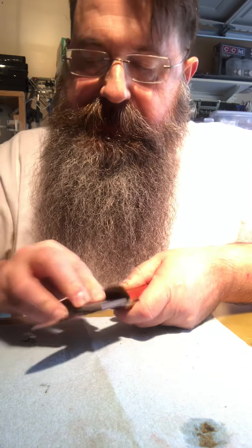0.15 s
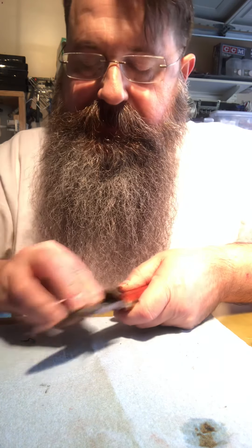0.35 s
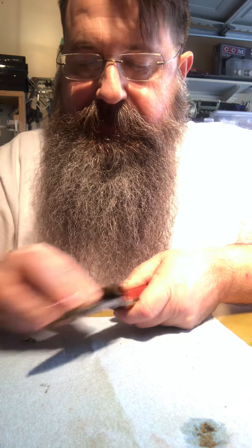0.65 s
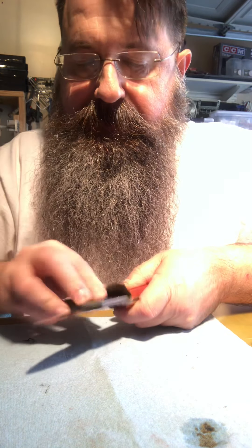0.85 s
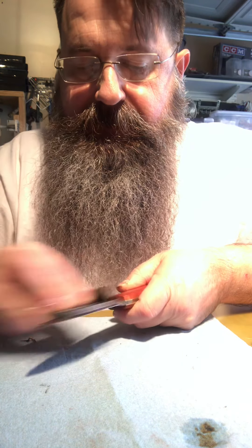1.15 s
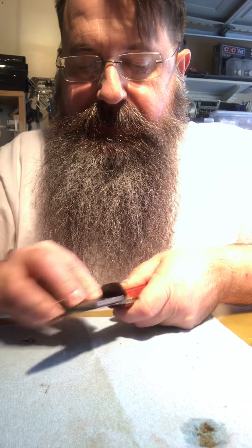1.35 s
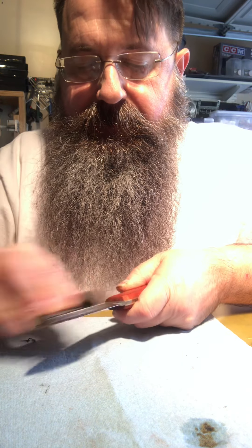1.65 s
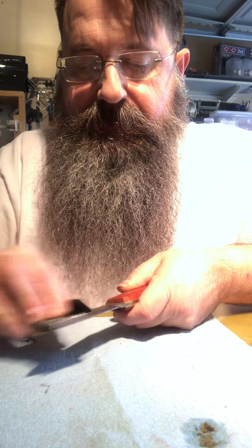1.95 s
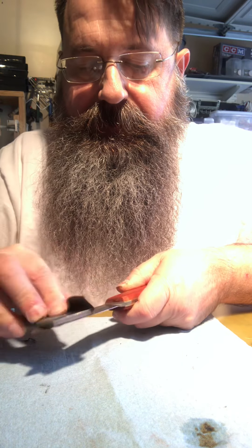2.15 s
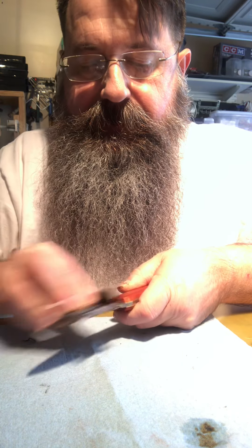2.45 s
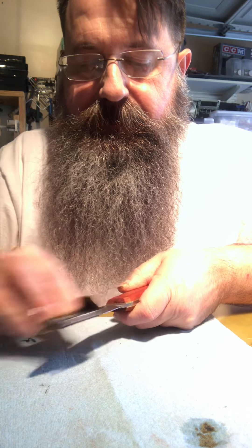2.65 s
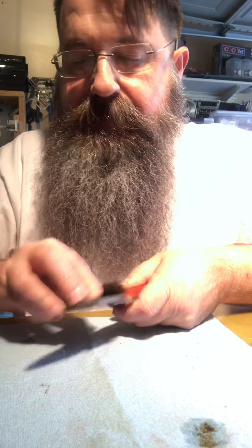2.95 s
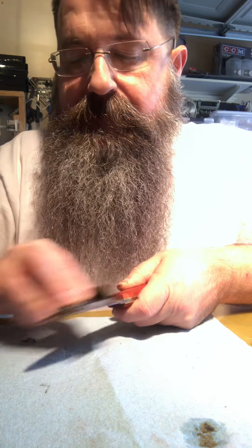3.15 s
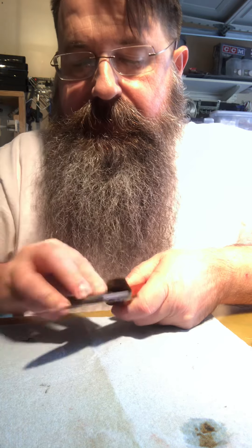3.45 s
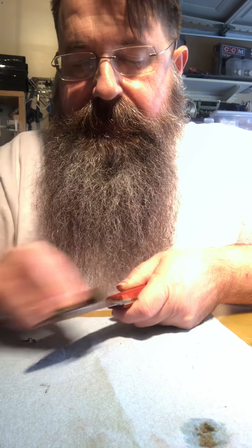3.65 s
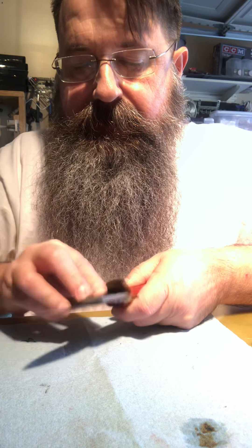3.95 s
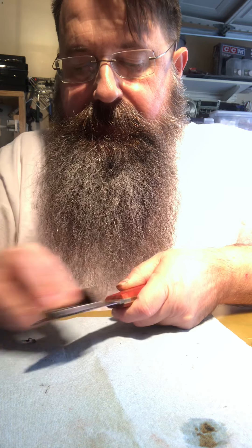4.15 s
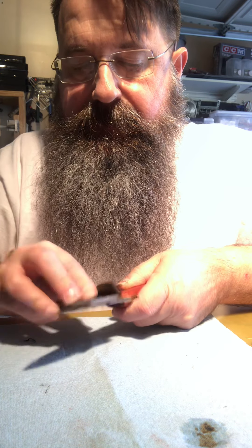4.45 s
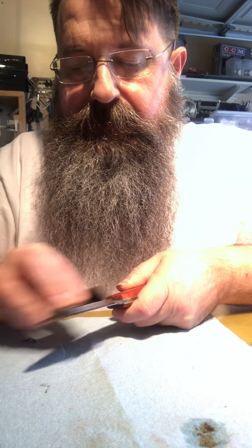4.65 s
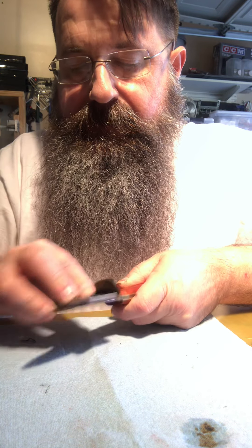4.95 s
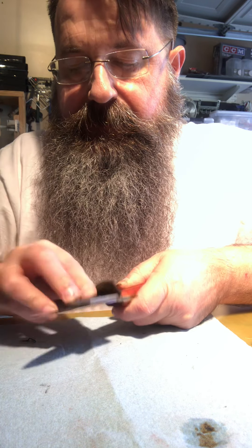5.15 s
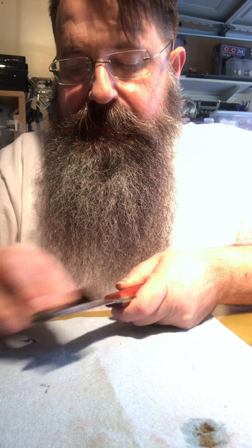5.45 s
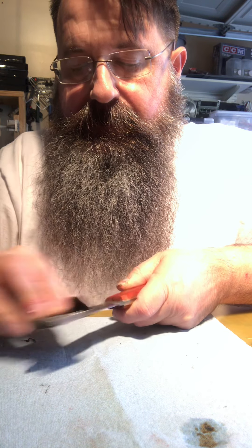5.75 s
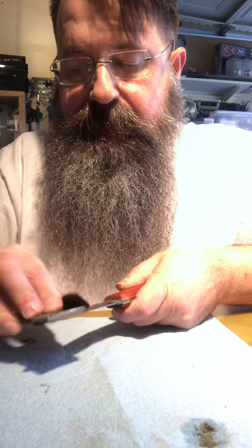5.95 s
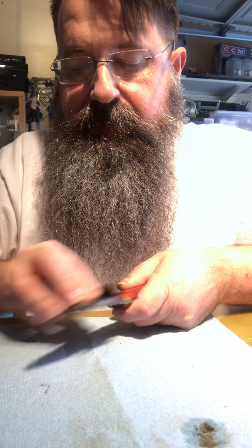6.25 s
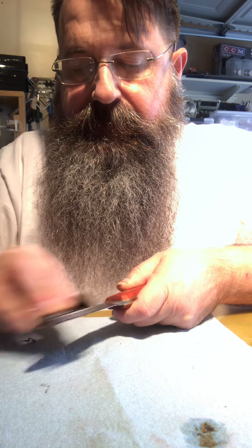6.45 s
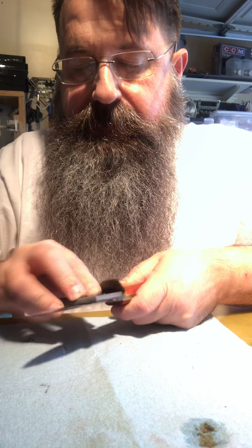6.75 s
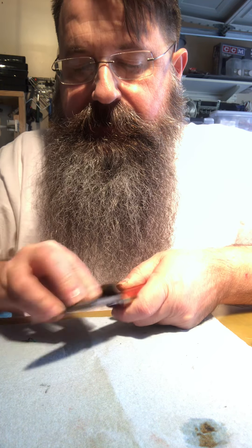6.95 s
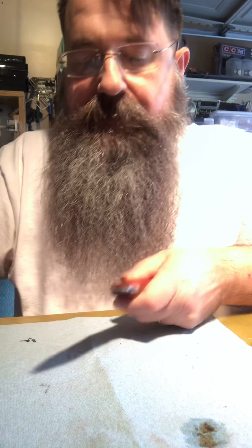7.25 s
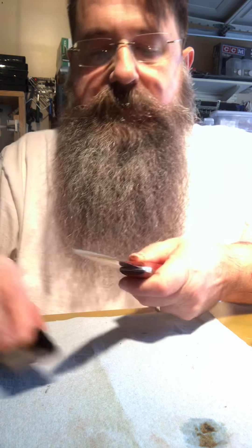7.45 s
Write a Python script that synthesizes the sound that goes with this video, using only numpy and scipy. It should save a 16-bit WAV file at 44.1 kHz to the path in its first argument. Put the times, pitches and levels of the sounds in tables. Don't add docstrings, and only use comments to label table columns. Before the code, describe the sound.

A close microphone in a small, fairly dry workshop picks up wet sandpaper already moving on a steel blade. From 0 to about 7.1 seconds it scrubs to and fro, roughly four full cycles a second; each stroke lasts about a tenth of a second, takes hold gradually and stops abruptly. Bright grit hiss carries a hollow steel ring that slides upward towards the handle and downward towards the tip. Some strokes begin with a tiny judder. Short, hard handle knocks interrupt at about 0.4, 2.0, 2.5, 2.7 and 3.4, loudest at 3.7 and 3.9, with faint bench thumps; afterwards the rubbing is mostly uninterrupted. Steady low mains hum, soft rumble and faint room air remain beneath. A last short flick comes at 7.1, then the sheet lifts with a light rustle, nearly silent until a sharp crackling slap at 7.5 and a brief settling rustle.

```python
import sys
import numpy as np
from scipy import signal
from scipy.fft import rfft, irfft, next_fast_len
from scipy.io import wavfile
from scipy.ndimage import uniform_filter1d, minimum_filter1d

SR = 44100
rng = np.random.default_rng(int(sys.argv[2]) if len(sys.argv) > 2 else 0)


def boost(x):
    u = np.asarray(x, float) / 20
    return 10 ** u


def to_wav(s):
    ch = np.atleast_2d(s).T
    pcm = np.round(np.clip(ch, -1, 1) * 32767)
    wavfile.write(sys.argv[1], SR, pcm.astype(np.int16))


N = 334719


def evened(x):
    return x / np.sqrt(np.mean(x ** 2) + 1e-20)


def read(points, hz):
    f, value = np.transpose(points)
    return np.interp(np.log(hz + 1), np.log(f + 1), value)


def add(mix, s, sound):
    part = mix[round(s * SR):][:len(sound)]
    part += sound[:len(part)]


def coloured(x, points):
    size = next_fast_len(len(x))
    gain = boost(read(points, np.fft.rfftfreq(size, 1 / SR)))
    return evened(irfft(rfft(x, size) * gain, size)[:len(x)])


def resonate(x, hz, width):
    turn = np.exp(2j * np.pi * np.cumsum(hz * np.ones(len(x))) / SR)
    r = np.exp(-np.pi * width / SR)
    smooth = signal.lfilter([(1 - r) ** 2], [1, -2 * r, r * r], x / turn + 1e-18)
    return 2 * (turn * smooth).real


def grains(per_s, spread_db):
    chance, e, sign = rng.random((N, 3)).T
    size = boost(spread_db * np.minimum(-np.log(1 - e), 5))
    return evened((chance < per_s / SR) * size * np.sign(sign - .5))


def thump_db(peak_db, bass_db):
    return min(peak_db + bass_db + 5.0, -42)


# f/Hz, level/dB rms
HUM = [(120.1, -49), (240.2, -79)]
# f/Hz, level/dB
RUMBLE = [(18, -42), (30, -30), (45, -1), (62, 2.5), (90, 0), (150, -2.5), (200, -17), (300, -22),
          (500, -80)]
# f/Hz, level/dB per Hz
ROOM = [(100, -68), (170, -8), (253, -9.5), (364, -6), (450, -11.5), (700, -11), (860, -11.5), (1400, -10),
        (2000, -5), (3000, -21.5), (6000, -65), (16000, -60)]


def background():
    t = np.arange(N) / SR
    bench, air, c, d = rng.standard_normal((N, 4)).T
    waver_db = 0.6 * evened(uniform_filter1d(uniform_filter1d(c, 6000), 6000))
    hum = sum(boost(db + waver_db) * np.sqrt(2) * np.sin(2 * np.pi * hz * t) for hz, db in HUM)
    wander_db = 1.5 * evened(uniform_filter1d(uniform_filter1d(d, 4000), 4000))
    shake = boost(-55.5 + wander_db)
    blows = [(s, thump_db(peak_db, bass_db) - 4.5) for s, peak_db, _, bass_db, _ in KNOCKS]
    blows += [(7.505, -40.5)]
    rise_s = 0.023
    for s, db in blows:
        after = np.maximum(t - s, 0) / rise_s
        shake = np.hypot(shake, boost(db) * after * np.exp(1 - after))
    return hum + shake * coloured(bench, RUMBLE) + boost(-64.5) * coloured(air, ROOM)


# start t/s, end t/s, pressure level/dB, free blade pitch at the end f/Hz
TOWARDS = [(0.023, 0.119, -36, 1450), (0.26, .348, -37.5, 1760), (0.486, 0.582, -35.5, 1750),
           (0.724, 0.813, -37.5, 1740), (0.967, 1.064, -38.5, 1660), (1.211, 1.304, -37.5, 1760),
           (1.453, 1.548, -39, 1790), (1.689, 1.785, -38.5, 1720), (1.925, 2.005, -37, 1820),
           (2.152, 2.248, -36.5, 1890), (2.39, 2.477, -39.5, 1850), (2.618, 2.692, -39, 1900),
           (2.853, 2.95, -37.5, 1840), (3.076, 3.184, -37.5, 1770), (3.326, 3.415, -39, 2035),
           (3.594, 3.679, -39, 1830), (3.843, 3.923, -39, 1520), (4.098, 4.197, -38.5, 1740),
           (4.351, 4.433, -36, 1610), (4.59, 4.675, -37, 1700), (4.82, 4.908, -39, 1910),
           (5.049, 5.128, -37.5, 1884), (5.262, 5.349, -35, 2070), (5.49, 5.586, -37.5, 1890),
           (5.724, 5.816, -37.5, 1870), (5.951, 6.04, -37.5, 1810), (6.171, 6.261, -37, 1800),
           (6.413, 6.5, -35.5, 1770), (6.639, 6.727, -36.5, 1660), (6.861, 6.952, -36.5, 1630)]
# start t/s, end t/s, pressure level/dB, free blade pitch at the end f/Hz
AWAY = [(0.144, 0.23, -35.5, 920), (0.382, 0.466, -34.5, 1270), (0.609, .696, -36, 1190),
        (0.844, .935, -37, 1190), (1.095, 1.18, -37, 1070), (1.331, 1.418, -37, 1090),
        (1.583, 1.668, -37.5, 1290), (1.825, 1.908, -37, 1160), (2.056, 2.134, -36.5, 1100),
        (2.274, 2.366, -39, 980), (2.508, 2.602, -37.5, 1280), (2.728, 2.828, -36.5, 1050),
        (2.962, 3.056, -38.5, 1040), (3.212, 3.306, -39.5, 950), (3.449, 3.547, -38, 1150),
        (3.715, 3.811, -38, 1230), (3.973, 4.07, -37, 1140), (4.229, 4.316, -35.5, 1250),
        (4.466, 4.553, -36, 1080), (4.699, 4.792, -40, 980), (4.943, 5.019, -36, 1280),
        (5.155, 5.233, -38, 1420), (5.378, 5.465, -37.5, 1400), (5.614, 5.7, -36.5, 1260),
        (5.842, 5.929, -36, 1330), (6.064, 6.148, -36.5, 1290), (6.3, 6.383, -36.5, 1070),
        (6.523, 6.612, -38, 1050), (6.745, 6.834, -36.5, 1300), (6.97, 7.081, -39.5, 1040)]
FIRST, FLICK = (0.0, .007, -31, 1450), (7.085, 7.136, -33.5, 1050)
# t/s, fine grit level/dB, blade ring level/dB
HOLD = [(0, 2, -21.5), (.5, 3, -22.5), (.95, 5.5, -18), (1.5, 5, -20.5), (2.15, 3, -22), (2.6, 4.5, -20),
        (3.1, 5, -21), (3.75, 6, -18), (4.3, 4.5, -20), (4.8, 3.5, -22), (5.3, 1.5, -23), (6.0, 3, -22.5),
        (6.6, 4, -20.5), (6.9, 2.5, -21.5), (7.03, 7, -20.5), (7.1, -3.5, -20)]


def hand():
    rise_s, fall_s = (.016, .011), .006
    sag_along_db, creep_level_db = (2.2, -2), (-51, -52)
    fine_way_db, ring_way_db = (0.64, 0.2), (-2.1, -0.8)
    arch_hz = 177

    t = np.arange(N) / SR
    s0, s1, press_db, end_hz = np.transpose(sorted([FIRST, FLICK] + TOWARDS + AWAY))
    span, towards = s1 - s0, np.arange(len(s0)) % 2
    knock_s, knock_db = np.transpose(KNOCKS)[:2]
    near_knock = abs(s1[:, None] - knock_s) < .02
    jolt_db = (near_knock * np.maximum(knock_db + 40, 0)).sum(1)

    sag_db = np.take(sag_along_db, towards) - .1 * jolt_db - 6.0 * (s0 >= s0[-2])
    knots = np.ravel([s0 + .2 * span, s0 + .75 * span], "F")
    knot_db = np.ravel([press_db - sag_db / 2, press_db + sag_db / 2], "F")
    pressure = boost(np.interp(t, knots, knot_db))
    start_hz = np.append(end_hz[0], end_hz[:-1])
    free_hz = np.interp(t, np.ravel([s0, s1], "F"), np.ravel([start_hz, end_hz], "F"))

    moving, speed = np.zeros((2, N))
    for a, b, way in zip(s0, s1, towards):
        near = slice(max(round((a - .06) * SR), 0), round((b + .05) * SR))
        taking_hold = 1 + np.exp((a - t[near]) * 4 / rise_s[way])
        stopping = 1 + np.exp((t[near] - b) * 4 / fall_s)
        moving[near] += 1 / taking_hold / stopping
        speed[near] += np.sin(np.pi * np.clip((t[near] - a) / (b - a), 0, 1))

    turn_db = (np.take(creep_level_db, towards) + 0.13 * jolt_db)[:-1]
    turn_s = np.ravel([np.minimum(s1[:-1] + 0.011, s0[1:]), s0[1:]], "F")
    creep_db = np.interp(t, turn_s, np.ravel([turn_db - 4.5, turn_db + 10.5], "F"))
    creep = boost(creep_db) * (t < s1[-1])

    hold_s, fine_db, ring_db = np.transpose(HOLD)
    middle = s0 + span / 2
    fine_db = np.interp(t, hold_s, fine_db) + np.interp(t, middle, np.take(fine_way_db, towards))
    ring_db = np.interp(t, hold_s, ring_db) + np.interp(t, middle, np.take(ring_way_db, towards))
    blade_hz = uniform_filter1d(free_hz + arch_hz * speed, 900)
    return np.hypot(pressure * moving, creep), speed, blade_hz, fine_db, ring_db


# f/Hz, level/dB per Hz
GRIT = [(1650, -66), (2800, -21), (3290, -17), (4430, -11), (4910, -9.5), (5240, -3), (5760, -6),
        (6620, -1.5), (7600, -3), (9600, -1.5), (10600, -6), (12300, 2), (14300, 3), (16000, -1)]
# tip f/Hz, handle f/Hz, width f/Hz, tip level/dB, handle level/dB
BLADE = [(2500, 2380, 1460, 3.5, 3.5), (3700, 3380, 300, 5.5, 1.5), (600, 680, 440, -3.5, -8),
         (4540, 4600, 480, 8, 10), (5080, 5350, 750, 4, 2), (5820, 3900, 240, 8.5, 8.5),
         (6600, 5200, 420, 2, 11.5)]


def sanding():
    pressure, speed, free_hz, fine_db, ring_db = hand()
    place = (free_hz - 1150) / 600
    hz, t, z = signal.stft(grains(14000, 2.2), SR, nperseg=256, noverlap=192)
    at = np.minimum(np.round(t * SR).astype(int), N - 1)
    fine = np.clip(np.log2((hz[:, None] + 1) / 7000) / 0.81, 0, 1)
    noise = rng.standard_normal(z.shape[::-1])
    patches = evened(uniform_filter1d(uniform_filter1d(noise, 24, 0), 3, 1)).T
    db = read(GRIT, hz)[:, None] + 2.3 * patches
    db = db + fine * (fine_db[at] - 6.0 + 5.1 * (speed[at] - .7))
    db = db - (1 - fine) * 3.06 * (place[at] - .5)
    hiss = evened(signal.istft(z * boost(db), SR, nperseg=256, noverlap=192)[1][:N])

    unevenness = evened(uniform_filter1d(rng.standard_normal(N), 600))
    drive = grains(8000, 2.2) * boost(2.2 * unevenness)
    ring = boost(6.0) * resonate(drive, free_hz, 165)
    grip_hz = uniform_filter1d(-minimum_filter1d(-free_hz, size=12000), size=9000)
    second_hz = 1.2 * grip_hz - 0.26 * (free_hz - grip_hz)
    ring += boost(5.0 - 11.5 * place) * resonate(drive, second_hz, 255)
    for tip_hz, handle_hz, width, tip_db, handle_db in BLADE:
        mode_hz = tip_hz + (handle_hz - tip_hz) * place
        mode_db = tip_db + (handle_db - tip_db) * place
        ring += boost(mode_db) * resonate(drive, mode_hz, width)
    return hiss * pressure * boost(0.73) + ring * pressure ** 0.41 * boost(ring_db - 11.5)


def workshop(x):
    t60 = .17
    taps = np.zeros(12000)
    taps[np.arange(100, 11980, 20) + rng.integers(0, 20, 594)] = rng.choice([-1., 1.], 594)
    hz, t, z = signal.stft(taps, SR, nperseg=128)
    thin = np.minimum(hz[:, None] / 2500, 1)
    decay = boost(-60 * t / t60 * (1 + hz[:, None] / 12000))
    tail = signal.istft(z * thin * decay, SR, nperseg=128)[1]
    return signal.fftconvolve(x, tail / np.linalg.norm(tail))[:N]


# t/s, peak level/dB,
# f/Hz
GRABS = [(0.0253, -38.5, 1350), (0.2568, -37, 1360), (0.4873, -34.5, 2140), (0.6013, -40, 1670),
         (0.7218, -41, 2080), (1.2027, -40.5, 1850), (1.4455, -40, 1770), (1.6876, -42.5, 2050),
         (2.1485, -38, 2180), (3.2038, -41, 2250), (3.3227, -38, 2040), (4.345, -38, 2070),
         (4.5805, -41, 1940), (5.488, -44.5, 1040), (5.9514, -38, 2250), (7.0967, -33, 1960),
         (7.113, -33.5, 288)]


def grabs():
    out, t = np.zeros(N), np.arange(2000) / SR
    swell = (t / .005) * np.exp(1 - t / .005)
    for (s, peak_db, hz), noise in zip(GRABS, rng.standard_normal((len(GRABS), 2000))):
        add(out, s, boost(peak_db - 10.5) * evened(resonate(noise, hz, 380)) * swell)
    return out


# t/s, peak level/dB, treble, bass and hardness level/dB
KNOCKS = [(0.192, -43, 9, -27, 12), (0.363, -22.5, -11, -36, -24), (0.808, -33, -8.5, -13.5, -6),
          (1.058, -36.5, -19, -19, -3), (1.779, -31.5, -5, -11.5, -6), (2.006, -17.5, 0, -20.5, -5),
          (2.468, -26, -8.5, -21.5, -6), (2.69, -12, -8.5, -30, -5.5), (3.075, -36, -2, -20, -23),
          (3.41, -17.5, -3, -22, -4.5), (3.671, -10, 4.5, -23, -2.5), (3.925, -7, 6.5, -28, -4),
          (6.258, -29.5, -31, -25, -7.5), (7.117, -33.5, -26, -40, -11)]
# f/Hz, level/dB, t60 t/s
HANDLE = [(360, -12.5, 0.033), (635, -6, 0.032), (1280, 0.5, 0.0079), (1810, 1.5, 0.012), (2350, -4, 0.005),
          (2860, 0, 0.0088), (3840, -4, 0.0058), (4440, -3.5, 0.0061), (5280, 2.5, 0.0039),
          (6420, -2, 0.0063), (11700, 0, 0.0018)]


def knocks():
    out, t = np.zeros(N), np.arange(6000) / SR
    hz, db, t60 = np.transpose(HANDLE)[:, :, None]
    bass_cut = signal.butter(3, 980, "high", fs=SR, output="sos")
    thump = np.sin(2 * np.pi * 85 * t) * (t / 0.0075) * np.exp(1 - t / 0.0076)
    rattle_t = t[:300]
    draws = rng.standard_normal((len(KNOCKS), 300 + len(hz)))
    for (s, peak_db, treble_db, bass_db, hard_db), draw in zip(KNOCKS, draws):
        contact = .075 * draw[:300] * np.exp(-rattle_t / .002)
        contact[[8, 72]] += 1, .35
        grip_db = (hz > 3300) * (treble_db + 7) + (hz < 900) * (bass_db + 19)
        grip_db = grip_db + (abs(hz - 2700) < 600) * (hard_db + 9)
        mode_hz = hz * (1 + .02 * draw[300:, None])
        modes = boost(db + grip_db - 60 * t / t60) * np.sin(2 * np.pi * mode_hz * t)
        upper = signal.sosfilt(bass_cut, modes[2:].sum(0))
        lower = 1.46 * modes[:2].sum(0) * (1 - np.exp(-t / 0.0047))
        click = signal.fftconvolve(contact, upper)[:len(t)] + lower
        add(out, s + .0004, boost(peak_db + 8.5) * click / abs(click).max())
        add(out, s + 0.0136, boost(thump_db(peak_db, bass_db)) * thump)
    return out


# t/s, level/dB, treble level/dB
LIFT = [
    (7.129, -46, -14),
    (7.15, -66, 3),
    (7.19, -58.5, -6),
    (7.225, -67, -6),
    (7.3, -72, 8),
    (7.35, -67, -0.5),
    (7.39, -83, 8),
]
# t/s, level/dB, treble level/dB
DROP = [
    (7.43, -69, 0),
    (7.46, -63, 0),
    (7.495, -56.5, -3),
    (7.508, -32, -18),
    (7.53, -42, -11),
    (7.566, -47.5, -1),
    (7.59, -57, 3),
]
# t/s, peak level/dB, treble level/dB, thud level/dB, crackle t/ms
SLAPS = [(7.173, -30, -16, -8.5, 2), (7.451, -46, -1, -15, 2.5), (7.472, -40.5, 4, -9, 3),
         (7.482, -38, -6, -9, 1.5), (7.4995, -42, -3, -20, 1.5), (7.5047, -13.5, -1.5, -15, 1),
         (7.51, -18.5, -7, -2.5, 2.6), (7.5175, -12.5, -6, -18, 3.6), (7.531, -35, -10, -22, 3),
         (7.553, -26.5, 0, -2, 7), (7.565, -42, -4, -10, 3)]


def paper():
    t, out = np.arange(N) / SR, np.zeros(N)
    s, db, treble_db = np.transpose(LIFT + DROP)
    soft, crackle = grains(15000, 3.3), grains(5000, 3.0)
    # f/Hz, level/dB
    sheet = [(400, -32), (1000, -7), (1900, -6.0), (2400, -4), (3000, -5), (4000, -4.5),
             (4800, -15), (7000, -37)]
    edge = [(4000, -30), (5500, 2.5), (7000, -1), (9000, -1), (10700, -8.0), (14000, -3), (16000, -13)]
    bench = [(40, -31), (80, -13), (140, 9), (230, -15), (350, -2), (600, -12.5), (900, -35)]
    level = boost(np.interp(t, s, db, left=-120) + 3.0)
    treble = boost(np.interp(t, s, treble_db))
    out += level * (coloured(soft, sheet) + treble * coloured(soft, edge))
    body, snap, thud = coloured(crackle, sheet), coloured(crackle, edge), coloured(soft, bench)
    for s, peak_db, treble_db, thud_level_db, ms in SLAPS:
        after = np.maximum(t - s, 0)
        burst = (t >= s) * np.exp(-after * 1000 / max(ms, .2)) * (body + boost(treble_db) * snap)
        swell = (after / 0.011) * np.exp(1 - after / 0.0089)
        out += boost(peak_db - 8.5) * (burst + boost(thud_level_db - 3.5) * swell * thud)
    return out


def scene():
    rub, hits = sanding() + grabs(), knocks() + paper()
    boxy = resonate(hits, 3180, 1240)
    echo = workshop(boost(-18) * rub + boost(-16.5) * hits + boost(-20) * boxy)
    mono = rub + hits + echo + background()
    return np.array([mono, mono])


def roll_off(x):
    return signal.sosfilt(signal.butter(12, 16990, fs=SR, output="sos"), x)


def record(dry):
    squeezed = np.sign(dry) * (.6 + .3 * np.tanh((abs(dry) - .6) / .3))
    softened = np.where(abs(dry) > .6, squeezed, dry)
    band = signal.firwin(601, 15950, window=("kaiser", 8), fs=SR)
    limited = signal.oaconvolve(softened, band[None], "same")
    return roll_off(limited)


dry = scene()
out = record(dry)
to_wav(out)
```